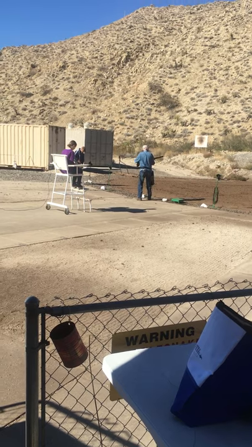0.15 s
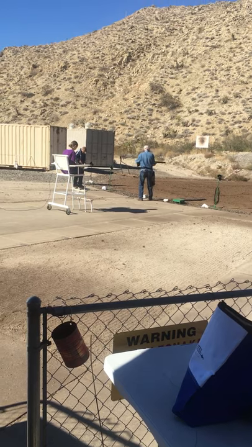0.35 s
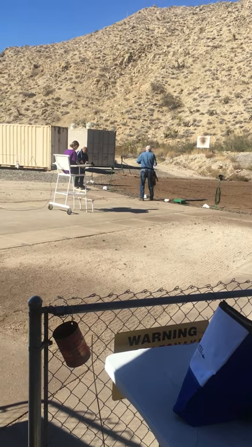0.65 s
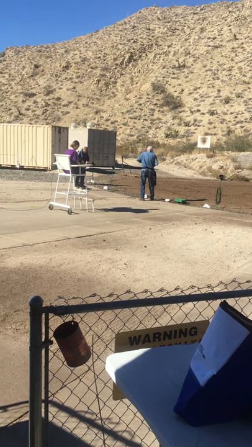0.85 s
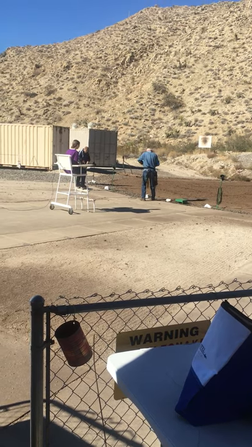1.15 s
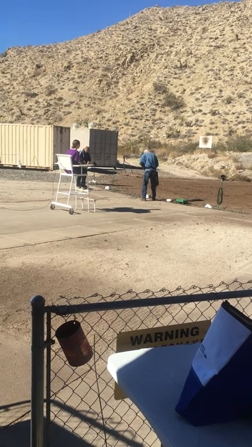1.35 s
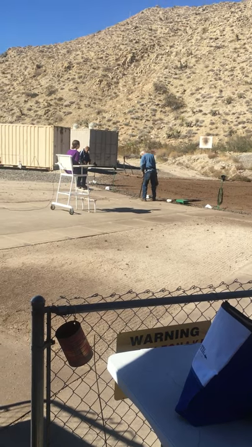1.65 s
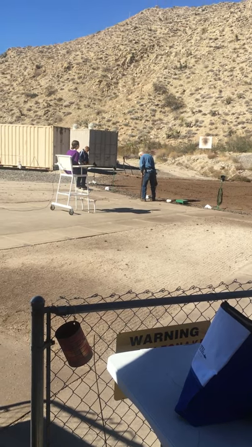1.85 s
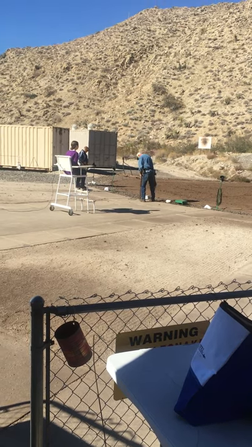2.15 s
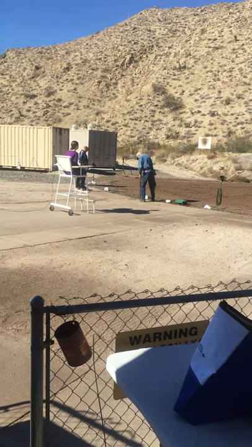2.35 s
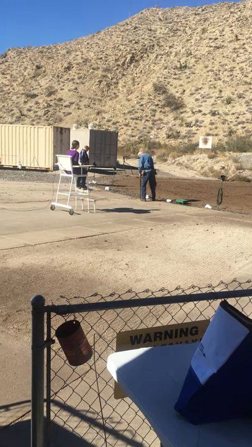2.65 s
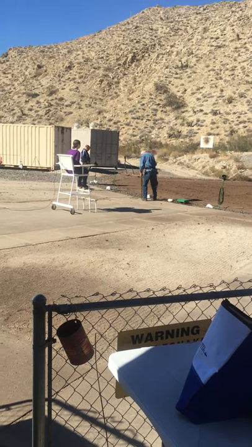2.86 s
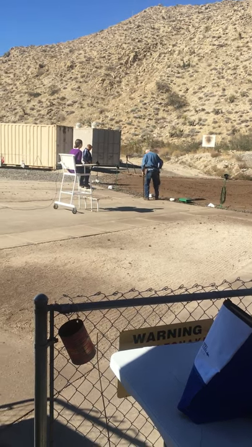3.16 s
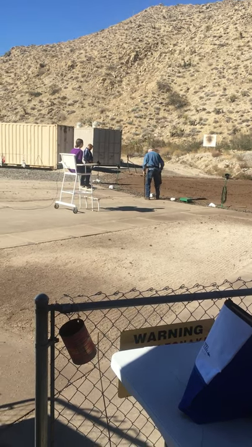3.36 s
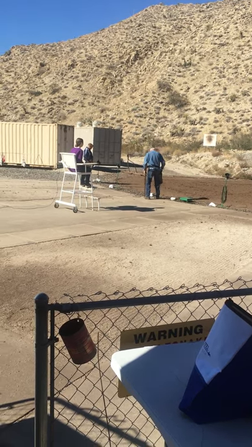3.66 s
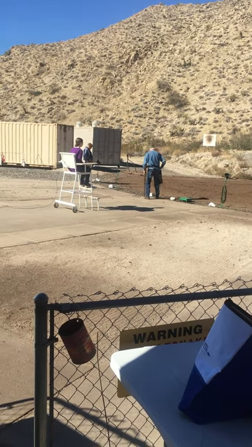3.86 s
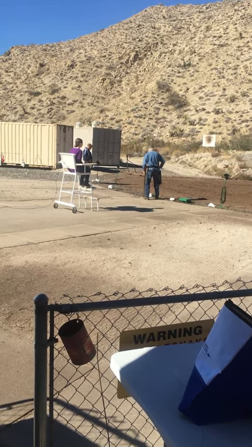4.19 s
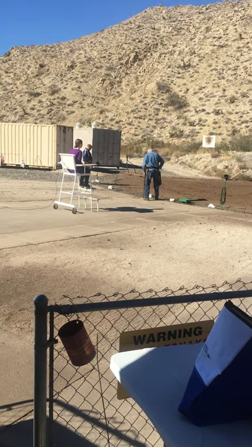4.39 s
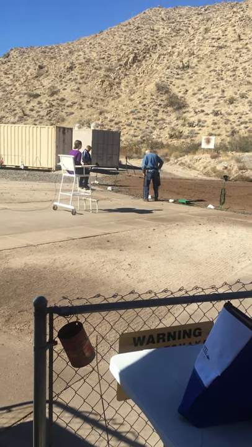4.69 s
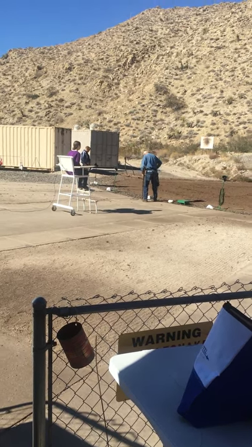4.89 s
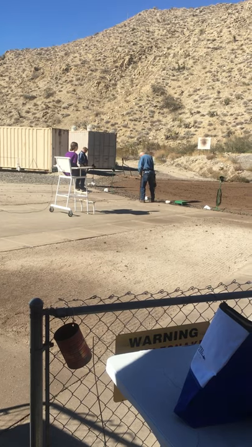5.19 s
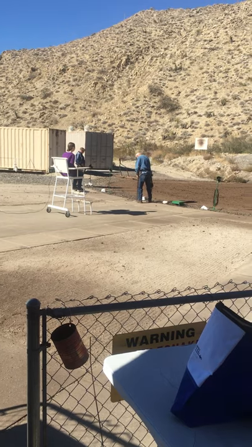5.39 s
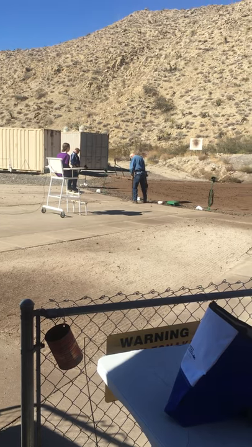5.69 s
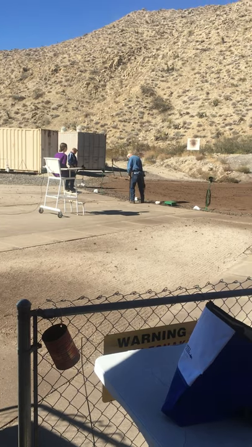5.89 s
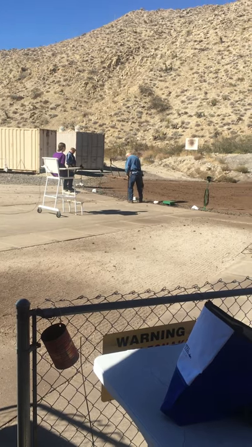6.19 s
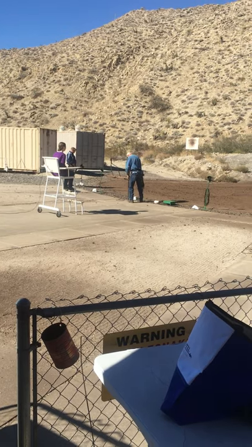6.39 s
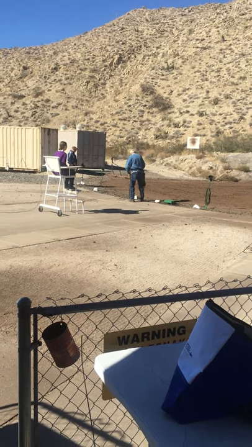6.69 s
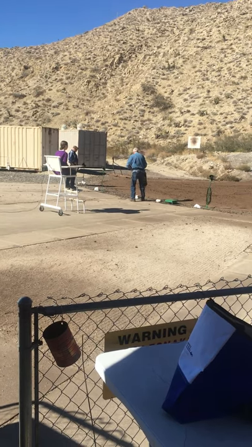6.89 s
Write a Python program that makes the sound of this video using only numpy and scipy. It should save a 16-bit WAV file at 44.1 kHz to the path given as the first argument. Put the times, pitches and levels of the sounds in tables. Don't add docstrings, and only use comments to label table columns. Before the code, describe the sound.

Sharp shotgun shots at uneven gaps slap off walls and rumble away over rocky slopes, above faint distant traffic and small metallic rattles.

```python
import sys
import numpy as np
from scipy import signal
from scipy.fft import rfft, irfft, next_fast_len
from scipy.io import wavfile
from scipy.ndimage import uniform_filter1d

SR = 44100
rng = np.random.default_rng(int(sys.argv[2]) if len(sys.argv) > 2 else 0)


def dump_mix(stems):
    frames = np.atleast_2d(stems).T
    limited = np.clip(frames, -1, 1)
    pcm = np.round(limited * 32767).astype(np.int16)
    wavfile.write(sys.argv[1], SR, pcm)


def rack_gain(trim_db):
    fader = np.asarray(trim_db, float)
    return 10 ** (fader / 20)


N = 310464

# pitch_hz, level_db (per Hz)
TRAFFIC_COLOUR = [(15, -53), (25, -20.5), (76, 0.5), (141, -21), (180, -16.5), (489, -24), (545, -22.5),
                  (754, -33.5), (1070, -25.5), (2160, -52), (2410, -54.5), (14800, -60.5), (16000, -66.5)]
# time_s, level_db
HISS_LEVEL = [(4.1, -80), (4.35, -78), (4.7, -82), (4.9, -75), (5.15, -70), (5.4, -69), (5.6, -80)]

# start_s, peak_db, centre_hz, rattle_t60_s, first_snap_db
CLACKS = [(3.495, -39.5, 4450, 0.035, -18.5), (3.498, -33, 2280, 0.078, 1), (3.508, -47.5, 4250, .14, -22),
          (3.772, -41, 5000, 0.19, -4.5), (3.781, -55, 3300, 0.12, -17), (3.812, -39.5, 7000, 0.049, 5),
          (3.835, -42.5, 6800, 0.07, 1), (3.845, -63, 5470, 0.22, -14.5), (3.79, -54, 7500, 0.27, -22),
          (3.95, -57.5, 3560, 0.21, -22.5), (4.865, -68, 2800, 0.2, -13.5),
          (4.888, -63.5, 4800, 0.086, -17.5), (5.163, -62, 4820, 0.086, -9.5)]
# start_s, peak_db, centre_hz
TICKS = [(0.1444, -52.5, 5990), (0.2494, -55, 6050), (0.3094, -57, 6300), (0.3294, -59, 6650),
         (0.3444, -63, 5330), (0.3694, -60, 6490), (0.3844, -60, 5200), (0.4094, -56, 5570),
         (0.4294, -59, 6910), (0.5044, -64, 5710), (0.5694, -66, 7060), (0.652, -49.5, 5000),
         (.659, -53, 5000), (.717, -48, 5000), (.725, -61, 5000), (1.135, -55, 6500), (1.9245, -52.5, 5870),
         (2.532, -42, 6290), (3.0094, -57.5, 5480), (3.5564, -62, 5680), (4.4474, -67, 6050),
         (5.6694, -42, 5860), (5.7074, -47, 6450), (6.4494, -64, 6500), (6.8796, -61.5, 5340),
         (7.0197, -61.5, 11500)]
# pitch_hz, width_hz, level_db
STEEL_MODES = [(2212, 150, 32.5), (3046, 200, 4.5), (4100, 226, -1), (4470, 250, 11.5), (5270, 220, 11.5),
               (5484, 220, -9), (7050, 330, 8), (7980, 390, -31), (13100, 920, 14)]
# time_s, level_db
SLIDE_LEVEL = [
    (3.59, -86),
    (3.596, -66),
    (3.64, -61),
    (3.722, -77),
    (3.73, -92),
]
# pitch_hz, width_hz, level_db
SLIDE_PEAKS = [(2443, 900, 1), (4200, 1500, -5.5), (6000, 1200, -0.5), (9800, 700, -4),
               (13400, 3000, -14.5)]
# start_s, peak_db, pitch_hz, t60_s, roughness_hz
CLINKS = [(1.355, -34, 3200, .15, 300), (1.403, -41, 5780, .15, 250), (1.52, -45, 3200, .16, 150),
          (1.553, -53, 9500, .04, 900), (2.69, -64, 9790, .6, 30), (4.45, -81, 11000, .3, 30),
          (4.46, -78, 15000, .3, 60), (4.582, -63, 4200, .04, 1500), (4.87, -65, 3050, .15, 300),
          (4.89, -61, 4100, .09, 700), (5.165, -63, 5300, .08, 500), (5.397, -43, 3200, .1, 200),
          (5.555, -31, 2250, .15, 300), (5.556, -37, 4500, .12, 300), (5.706, -53, 3190, .15, 150),
          (3.85, -62, 5300, .22, 450), (5.81, -52, 3250, .15, 120), (6.667, -66, 5500, .3, 250),
          (6.69, -76, 11700, .25, 40), (6.84, -73, 10200, .1, 200), (6.875, -73, 11400, .1, 300),
          (6.97, -71, 5600, .15, 400), (6.985, -69, 11700, .6, 40)]

# low_hz, high_hz
LAYER_EDGES = [(150, 420), (450, 1400), (1500, 4500), (5000, 15500)]
# pitch_hz, level_db
GROUND_COLOUR = [(35, -38), (70, -15.5), (120, -8.5), (190, -5), (330, 1.5), (480, 0), (680, 2.5),
                 (960, 0.5), (1360, 0.5), (1920, 0.5), (2700, -3.5), (5000, -1.5), (9000, -0.5),
                 (15500, -11)]
# start_s, body_db, fall_db_per_s, crack_db, air_db (the last two against the body)
SHOTS = [
    (1.2026, -17, 165.5, 1, -6.5),
    (2.2556, -12, 172.5, -7, -12.5),
    (5.41, -9.5, 236, -9.5, -12),
]
SHOT_BOOM_DB = (-3.5, -5, -4.5)
SCRUB_DB = (-41.5, -33.5, -36)
# start_s, body_db, lasts_s, crack_db, air_db
SHOWERS = [(1.283, -34, .045, 8, 5), (1.39, -42.5, 0.081, 2, -2), (1.52, -58, .07, 7, 0),
           (2.234, -47.5, .015, -7.5, -21.5), (2.385, -30.5, 0.029, 5, -7.5), (2.478, -34, 0.044, -4, -13),
           (2.585, -49.5, 0.054, -2.5, -13), (2.655, -51.5, 0.018, 3, -10),
           (5.385, -37, .008, -18.5, -23.5), (5.395, -27, .008, -36, -44), (5.554, -34.5, 0.015, -3, -10),
           (5.625, -38, 0.051, -10, -12), (5.797, -64, 0.0046, 7, -3), (5.7, -56, 0.075, 3, -6),
           (1.14, -62, 0.12, 0, -15)]
# start_s, body_db, lasts_s, crack_db, air_db
HILL_FEET = [
    (1.62, -40, .31, 3.5, -11),
    (2.685, -30, .24, -13, -24),
    (5.83, -43, 0.35, -5, -16),
]
# start_s, body_db, lasts_s, crack_db, air_db
HILL_CRESTS = [
    (-.05, -35, 0.11, -13.5, -32.5),
    (1.75, -39.5, .03, -8, -22.5),
    (2.84, -33.5, 0.12, -15, -33.5),
    (6.01, -29, 0.069, -21.5, -35.5),
]
# start_s, body_db, lasts_s, fall_db_per_s
SLOPES = [(0.285, -41.5, 0.055, 21), (.388, -43.5, 0.034, 36), (0.558, -46.5, 0.25, 65),
          (0.938, -46, 0.094, 84), (3.16, -48.5, .02, 144), (3.275, -40.5, 0.27, 89.5),
          (3.81, -48.5, 0.047, 63), (3.88, -43, 0.067, 163.5), (6.344, -49, 0.028, 105.5),
          (6.44, -47, 0.1, 36), (6.56, -48.5, 0.2, 121.5), (7.0, -48, 0.034, 59.5)]
# rise_db_per_s, fall_db_per_s, boom_db, boom_gain_db_per_s, treble_loss_db_per_s
FOOT_KIND = (500, 117, -18, 37, 36)
CREST_KIND = (72, 91, -3, 8.5, 13)
SHOWER_KIND = (5998, 259, -9, 10.5, 25.5)
SCRUB_KIND, SCRUB_DELAY_S = (400, 47, 1.6, 5, 20), 0.09

# start_s, peak_db, centre_hz, blast_length_ms, spray_db
SLAPS = [(1.2070, -4, 1780, 0.81, -37), (1.227, -10.5, 7000, 0.18, -7), (1.286, -14, 6000, 0.27, -5),
         (1.2982, -8.5, 4800, 0.43, 8), (1.2993, -6, 12450, .1, -16), (1.306, -8, 4500, 0.33, -11),
         (1.3085, -18, 3000, 0.29, -18), (2.2566, -2.5, 1620, 0.8, -34), (2.307, -15, 6000, 0.33, -19),
         (2.344, -14, 1600, 0.52, -23), (2.359, -1.5, 2200, 0.28, -25), (2.367, -21, 4000, 0.25, -14),
         (2.433, -22.5, 5500, .3, -8), (2.4835, -14.5, 1360, 0.56, -29), (5.3852, -31.5, 1500, 1, -19),
         (5.408, -2.5, 1820, 0.65, -12), (5.554, -24, 2300, 0.66, -5), (5.5655, -31, 6000, 0.52, -13),
         (5.584, -27.5, 5500, 0.27, -2)]
# start_s, peak_db, pitch_hz, t60_s
KNOCKS = [(0.378, -32.5, 329, 0.13), (0.433, -25.5, 339, 0.11), (6.557, -32, 344, 0.12),
          (6.611, -32, 323, 0.16), (6.721, -47.5, 366, 0.12), (2.906, -23.5, 880, .05),
          (5.903, -24, 764, .04), (5.939, -23.5, 700, 0.044), (6.041, -23.5, 629, 0.11)]
# start_s, peak_db, pitch_hz, t60_s
BOOMS = [(1.206, -16.5, 222, 0.19), (1.213, -30, 119, 0.44), (2.258, -13, 604, 0.24),
         (2.258, -10.5, 1047, 0.13), (2.258, -11, 150.7, 0.17), (2.264, -18.5, 98, 0.14),
         (5.409, -13.5, 103.6, 0.21), (5.412, -20.5, 616.4, 0.31), (5.417, -24.5, 176, 0.57)]

# pitch_hz, width_hz, depth_0_to_1
CASE_DIPS = [(4740, 460, 0.3), (7750, 810, 0.3), (10500, 1500, 0.4)]

TRAFFIC_DB = -46
RING_SHARE, TICK_T60_S = .75, .022
BOOM_HZ, BODY_LOW_HZ, BODY_HIGH_HZ, CRACK_LOW_HZ, CRACK_HZ, AIR_HZ = 320, 555, 864, 1632, 2420, 8500
FRONT_RISE_DB_S, AIR_LOSS_RATIO = 30001.5, 3.3
BLAST_HOLD_S, BLAST_BOOM_GAIN, BLAST_LOSS = .014, 60, 3.9
SLOPE_RISE_DB_S, SLOPE_BOOM_DB, SLOPE_CRACK_DB, SLOPE_AIR_DB = 166, -1.5, -25.5, -52
VALLEY_DB, VALLEY_BOOM_DB, VALLEY_CRACK_DB, VALLEY_AIR_DB = -57, -2, -26.5, -45
SPRAY_LOW_HZ = 4000
TABLE_MS, TABLE_SHARE = .9, 0.043
TOP_HZ, CEILING, KNEE = 15900, .72, 3
HALF_OCTAVES = 30 * 2 ** np.arange(0, 9.6, .5)


def level(x):
    return x / np.sqrt(np.mean(x ** 2))


def on_log(hz, points):
    f, db = np.transpose(points)
    return np.interp(np.log(hz), np.log(f), db)


def bands(x, centres, octaves=.5):
    size = next_fast_len(N)
    spectrum = rfft(x, size)
    place = np.log2(np.arange(1, size // 2 + 2) * SR / size)
    for hz in centres:
        distance = np.clip((place - np.log2(hz)) / octaves, -1, 1)
        yield irfft(spectrum * np.cos(np.pi / 2 * distance) ** 2, size)[:N]


def walk(rate):
    k = int(SR / rate)
    steps = np.repeat(rng.standard_normal(N // k + 1), k)
    return level(uniform_filter1d(uniform_filter1d(steps, k), k)[:N])


def reson(x, hz, width_hz):
    return signal.lfilter(*signal.iirpeak(hz, hz / width_hz, fs=SR), x)


def ring(hz, t60):
    t = np.arange(int(t60 * SR)) / SR
    return np.sin(2 * np.pi * hz * t) * 1000 ** (-t / t60)


def add(out, s, sound, db):
    i = int(s * SR)
    out[i:i + len(sound)] += (rack_gain(db) * sound / np.abs(sound).max())[:N - i]


def traffic(swell_db=1.0, flicker_db=1.5):
    swell = swell_db * walk(1.0)
    noise = bands(rng.standard_normal(N), HALF_OCTAVES)
    out = np.zeros(N)
    for hz, band in zip(HALF_OCTAVES, noise):
        motion = (swell + flicker_db * walk(24)) * min(300 / hz, 1)
        out += band * rack_gain(on_log(hz, TRAFFIC_COLOUR) + motion)
    return level(out) * rack_gain(TRAFFIC_DB)


def hiss():
    noise = rng.standard_normal(N)
    main = reson(reson(noise, 2380, 450), 2380, 450)
    sound = level(main + .1 * reson(noise, 6500, 4000))
    db = np.interp(np.arange(N) / SR, *np.transpose(HISS_LEVEL), -120, -120)
    return sound * rack_gain(db + 0.5 * walk(4))


def clacks_and_ticks():
    out, t = np.zeros(N), np.arange(SR // 3) / SR
    hits = [(*row, RING_SHARE) for row in CLACKS]
    hits += [(*row, TICK_T60_S, 0, 0) for row in TICKS]
    shape = (len(hits), len(t))
    grit = rng.standard_normal(shape) * rack_gain(2.0 * rng.exponential(size=shape))
    for (s, db, hz, t60, snap_db, share), shake in zip(hits, grit):
        rattle = .5 * 1000 ** (-t / t60) * np.minimum(t / 0.0023, 1)
        snap = rack_gain(snap_db) * 1000 ** (-t / 0.0076)
        burst = shake * (rattle + snap)
        sound = level(reson(reson(burst, hz, hz * 1.2), hz, hz * 1.2))
        steel = 0
        for f, width, gain_db in STEEL_MODES:
            near_db = gain_db - 31 * np.log2(f / hz) ** 2
            steel = steel + rack_gain(near_db) * level(reson(burst, f, width))
        add(out, s, sound + share * steel, db)
    return out


def clinks():
    out, t = np.zeros(N), np.arange(SR // 3) / SR
    for s, db, hz, t60, rough_hz in CLINKS:
        shake = rng.standard_normal(len(t)) * 1000 ** (-t / t60)
        add(out, s, reson(reson(shake, hz, rough_hz), hz, 2 * rough_hz), db)
    return out


def shell_slide():
    grit = rng.standard_normal(N) * rack_gain(2.2 * rng.exponential(size=N))
    slide = level(sum(rack_gain(g) * reson(grit, f, w) for f, w, g in SLIDE_PEAKS))
    s, db = np.transpose(SLIDE_LEVEL)
    return slide * rack_gain(np.interp(np.arange(N) / SR, s, db, -120, -120))


def arrival(t, s, db, lasts, crack_db, air_db, kind):
    rise, fall, boom_db, gain, loss = kind
    age = np.clip(t - s, 0, 1)
    body = db - rise * np.maximum(s - t, 0) - fall * np.maximum(t - s - lasts, 0)
    boom = boom_db + gain * age
    crack = crack_db - loss * age
    air = air_db - AIR_LOSS_RATIO * loss * age
    return rack_gain(2 * (body + np.array([boom, 0 * age, crack, air])))


def terrain(t):
    valley = np.array([[VALLEY_BOOM_DB], [0], [VALLEY_CRACK_DB], [VALLEY_AIR_DB]])
    power = rack_gain(2 * (VALLEY_DB + valley))
    for (s, db, fall, crack, air), boom, scrub_db in zip(SHOTS, SHOT_BOOM_DB, SCRUB_DB):
        blast = (FRONT_RISE_DB_S, fall, boom, BLAST_BOOM_GAIN, BLAST_LOSS)
        power = power + arrival(t, s, db, BLAST_HOLD_S, crack, air, blast)
        power = power + arrival(t, s + SCRUB_DELAY_S, scrub_db, 0, crack, air, SCRUB_KIND)
    for rows, kind in ((HILL_FEET, FOOT_KIND), (HILL_CRESTS, CREST_KIND), (SHOWERS, SHOWER_KIND)):
        for row in rows:
            power = power + arrival(t, *row, kind)
    for s, db, lasts, fall in SLOPES:
        slope = (SLOPE_RISE_DB_S, fall, SLOPE_BOOM_DB, 0, 0)
        power = power + arrival(t, s, db, lasts, SLOPE_CRACK_DB, SLOPE_AIR_DB, slope)
    return 10 * np.log10(power)


def returns(scatter_db=2.2, flicker_db=1.2, swell_db=.7, facet_db=1.1):
    layers = np.repeat(terrain(np.arange(0, N, 8) / SR), 8, axis=1)[:, :N]
    lo, hi = np.transpose(LAYER_EDGES)
    layers -= 10 * np.log10((hi - lo)[:, None] / (SR / 2))
    rocks = level(rng.standard_normal(N) * rack_gain(scatter_db * rng.exponential(size=N)))
    swell = swell_db * walk(40)
    facets = facet_db * walk(160)
    seats = np.log([BOOM_HZ, BODY_LOW_HZ, BODY_HIGH_HZ, CRACK_LOW_HZ, CRACK_HZ, AIR_HZ])
    out = np.zeros(N)
    for hz, band in zip(HALF_OCTAVES, bands(rocks, HALF_OCTAVES)):
        place = np.interp(np.log(hz), seats, [0, 1, 1, 1.8, 2, 3])
        k = min(int(place), 2)
        db = layers[k] + (place - k) * (layers[k + 1] - layers[k])
        motion = swell + flicker_db * walk(25) + facets * min(hz / 2500, 1)
        out += band * rack_gain(db + on_log(hz, GROUND_COLOUR) + motion)
    return out


def knocks_and_booms():
    out = np.zeros(N)
    for s, db, hz, t60 in list(KNOCKS) + list(BOOMS):
        knock = ring(hz, t60)
        add(out, s, knock * np.minimum(np.arange(len(knock)) / SR / 0.0028, 1), db)
    return out


def blast_fronts(ring_db=3, rise_ms=0.16):
    out, t = np.zeros(N), np.arange(600) / SR
    keep = np.exp(-1000 / (rise_ms * SR))
    for s, db, hz, ms, spray_db in SLAPS:
        length_s = ms / 1000
        n_wave = (1 - 2 * t / length_s) * (t < length_s)
        front = signal.lfilter([1 - keep], [1, -keep], n_wave)
        spray_hz = max(hz, SPRAY_LOW_HZ)
        spray = rng.standard_normal(len(t)) * np.exp(-t / 0.0018)
        spray = reson(reson(spray, spray_hz, spray_hz * 1.3), spray_hz, spray_hz * 1.3)
        ringing = rack_gain(ring_db) * reson(front, hz, hz / 3)
        add(out, s, front + ringing + 3 * rack_gain(spray_db) * spray, db)
    return out


def scene():
    near = traffic() + clacks_and_ticks() + clinks() + shell_slide()
    range_side = hiss() + returns()
    bounced = np.roll(range_side, int(TABLE_MS * SR / 1000))
    long_wave_cut = signal.butter(1, 600, "high", fs=SR, output="sos")
    bounced = signal.sosfiltfilt(long_wave_cut, bounced)
    return (near + range_side + TABLE_SHARE * bounced + knocks_and_booms() + blast_fronts())[None]


def top_cut(x):
    return signal.sosfilt(signal.butter(12, 16810, fs=SR, output="sos"), x)


def record(dry):
    x = dry
    for hz, width_hz, depth in CASE_DIPS:
        x = x - depth * reson(x, hz, width_hz)
    x = signal.sosfilt(signal.butter(3, 30, "high", fs=SR, output="sos"), x)
    x = x / (1 + np.abs(x / CEILING) ** KNEE) ** (1 / KNEE)
    x = signal.sosfiltfilt(signal.ellip(6, .1, 20, TOP_HZ, fs=SR, output="sos"), x)
    return top_cut(x)


dry = scene()
out = record(dry)
dump_mix(out)
```